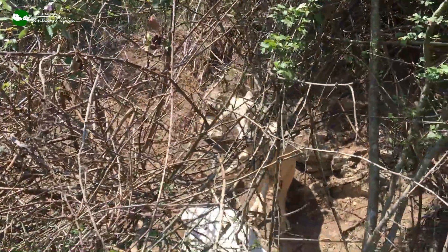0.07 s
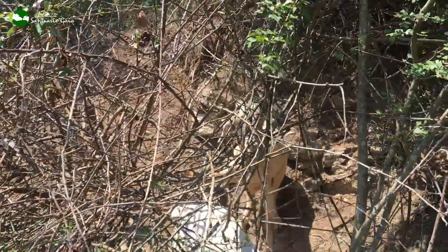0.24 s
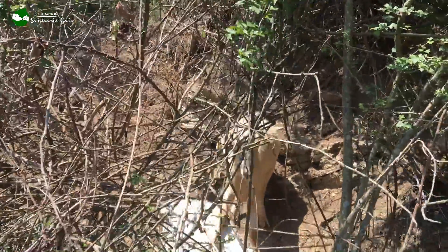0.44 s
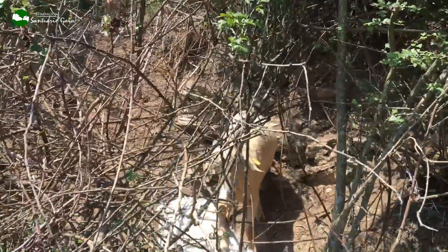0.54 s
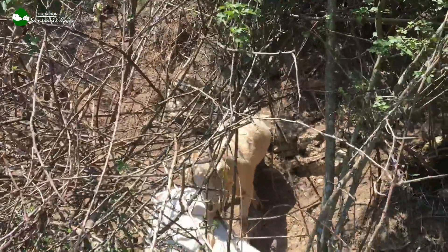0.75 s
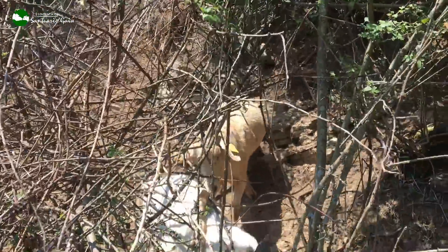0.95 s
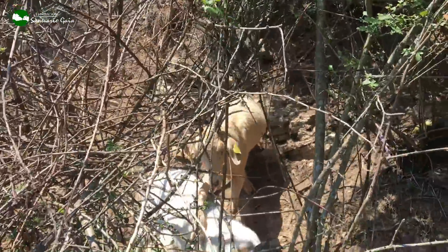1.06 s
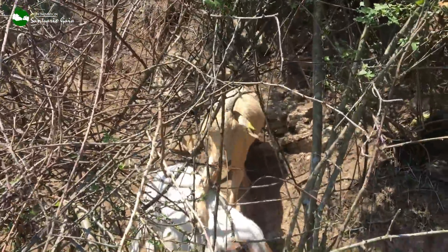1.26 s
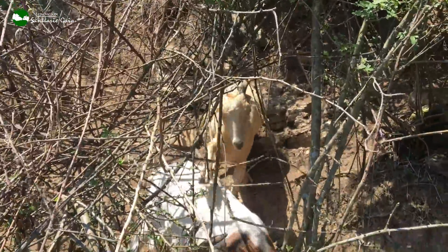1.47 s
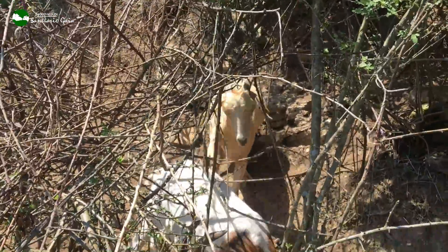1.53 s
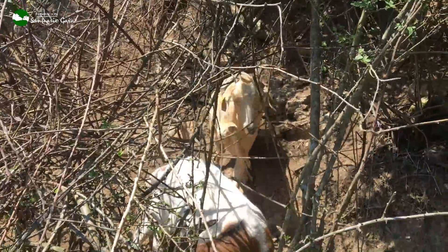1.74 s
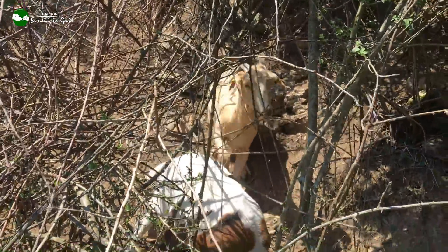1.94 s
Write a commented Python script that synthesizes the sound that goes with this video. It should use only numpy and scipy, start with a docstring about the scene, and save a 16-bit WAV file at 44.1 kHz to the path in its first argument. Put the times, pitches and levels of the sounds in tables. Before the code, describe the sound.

Goats moving through dead branches: light ticks, a dense burst of sharp snaps and leaf crunching, a quieter stretch, then late cracks. Soft dull hoof thuds and low outdoor air noise, dry single-channel pickup.

```python
"""Twigs crack in short splintering bursts, dry leaves crackle, hooves thud dully and air hisses and rumbles
quietly, as goats push through dry brush outdoors; a faint low tone swells in at the end.
Snaps and crunches are fading runs of noise that ring like dry wood. Leaves are thousands of tiny ticks
a second. Hooves are short low waves that sag in pitch, with dull grit. Hiss and rumble are filtered noise,
and the tone is a sine."""
import sys
import numpy as np
from scipy import signal
from scipy.fft import rfft, irfft
from scipy.io import wavfile

SR = 44100
rng = np.random.default_rng(int(sys.argv[2]) if len(sys.argv) > 2 else 0)


def linear_from_db(decibels):
    """Turn decibels (scalar or array-like) into linear amplitude factors; 0 gives 1."""
    return 10 ** (np.asarray(decibels, float) / 20)


def output_pcm(signal):
    """Save a mono or channel-first signal as 16-bit PCM at the path in sys.argv[1].

    Samples are clipped to [-1, 1] before scaling.
    """
    pcm = np.clip(np.atleast_2d(signal).T, -1, 1) * 32767
    wavfile.write(sys.argv[1], SR, np.round(pcm).astype(np.int16))


N = 88200   # length in samples: two seconds


def rms_one(x):
    """Scale a sound so that its average strength (rms) is 1."""
    return x / np.sqrt(np.mean(x ** 2) + 1e-20)


def band_filter(x, hz, kind):
    """Second-order Butterworth filter: keeps the lows, the highs or a band, with soft edges."""
    return signal.sosfilt(signal.butter(2, hz, kind, fs=SR, output="sos"), x)


def colour(x, db_of_hz):
    """Filter with the given gain in dB at each pitch, with no ringing ahead of a sound (minimum phase)."""
    size = 8192
    hz = np.maximum(np.arange(size // 2 + 1), 1) * SR / size
    log_gain = db_of_hz(hz) * np.log(10) / 20
    cepstrum = irfft(log_gain)
    # folding the second half onto the first makes the filter respond only after its input
    cepstrum[1:size // 2] *= 2
    cepstrum[size // 2 + 1:] = 0
    response = irfft(np.exp(rfft(cepstrum)))[:size // 2]
    return signal.fftconvolve(x, response)[:len(x)]


def table(points):
    """Turn (f/Hz, level/dB) points into a smooth function of Hz, straight between points in log pitch."""
    hz, db = np.transpose(points)
    return lambda f: np.interp(np.log(f), np.log(hz), db)


def drift(rate_hz):
    """Slow random wandering with rms 1: noise smoothed twice above about rate_hz."""
    r = np.exp(-2 * np.pi * rate_hz / SR)
    wander = signal.lfilter([1], [1, -2 * r, r * r], rng.standard_normal(N + SR))
    return rms_one(wander[SR:])   # the first second only settles the filter


def air():
    """Far hiss with a slight flicker, and a lumpy low rumble: two filtered noises."""
    # colour of the hiss: f/Hz, relative level/dB
    hiss_colour = [(40, -0.5), (100, -7), (300, -10), (700, -12), (1500, -10.5), (3000, -17.5), (7000, -21),
                   (16000, -20.5)]
    # loudness of the rumble, before its lumps: t/s, level/dB
    rumble_level = [(0, -69), (.25, -72), (.5, -64), (.9, -67), (1.2, -69.5), (1.4, -87), (1.7, -69),
                    (2.0, -72.5)]
    hiss_db, flicker_db, flicker_hz = -66, 1.5, 13.6
    lumps_db, lumps_hz = -4.5, 1.7
    hiss = colour(rng.standard_normal(N + SR), table(hiss_colour))
    hiss = rms_one(band_filter(hiss, 30, "high")[SR:])
    rumble = rms_one(band_filter(rng.standard_normal(N + SR), [35, 168], "band")[SR:])
    rumble_db = np.interp(np.arange(N) / SR, *np.transpose(rumble_level))
    hiss = linear_from_db(hiss_db + flicker_db * drift(flicker_hz)) * hiss
    return hiss + linear_from_db(rumble_db + lumps_db * drift(lumps_hz)) * rumble


def faint_tone():
    """A faint low tone near the end: a sine that swells in and stays."""
    start_s, rise_s, pitch_hz, level_db = 1.968, .025, 500, -59
    t = np.arange(N) / SR - start_s
    swell = np.clip(t / rise_s, 0, 1)
    return linear_from_db(level_db) * swell * np.sin(2 * np.pi * pitch_hz * t)


def hooves():
    """Hooves on soil: each is a soft push of a few low cycles that sag in pitch, with dull grit."""
    # hoof falls: t/s, level/dB, f/Hz (it sags from 1.2 to 0.7 times this), length/ms
    thuds = [(0.018, -59, 44.9, 125), (0.468, -50.5, 70, 45), (0.572, -53, 75, 45), (.703, -49, 88, 48),
             (1.098, -48, 130, 37), (1.715, -59, 190, 50)]
    grit_share = .45
    out = np.zeros(N + SR)
    grit = rms_one(band_filter(rng.standard_normal(N + SR), [40, 320], "band"))
    for (s, db, hz, ms), turn in zip(thuds, rng.random(len(thuds))):
        u = np.linspace(0, 1, int(ms * SR / 1000))   # progress through the thud
        start = int(s * SR)
        cycles = hz * ms / 1000 * (1.2 * u - .25 * u * u)
        push = np.sin(2 * np.pi * (cycles + turn)) + grit_share * grit[start:start + len(u)]
        out[start:start + len(u)] += linear_from_db(db) * np.sin(np.pi * u) ** 2 * push
    return out[:N]


def leaves():
    """Dry leaves: thousands of tiny uneven ticks a second, in clumps and sudden small bursts."""
    # movement in the brush: t/s, crackle level/dB, brightness/dB (treble up and the rest down by this)
    stir = [(0, -58.5, -0.5), (0.099, -54.5, -2), (0.203, -68, 2), (.205, -49.5, 0), (0.259, -49.5, 0),
            (.29, -57.5, -5), (0.428, -56, 0.5), (0.432, -45.5, -2), (.455, -45, -0.5), (0.496, -39, 3.5),
            (0.533, -48, 3), (0.575, -43.5, 3), (.61, -40.5, -2), (.64, -43.5, -0.5), (.675, -47.5, -1),
            (.72, -49, -1.5), (.79, -56.5, -3), (.9, -62.5, 0.5), (1.0, -64.5, -1.5), (1.11, -59.5, -2.5),
            (1.16, -69, -1.5), (1.35, -77, -5.5), (1.45, -65.5, 4), (1.53, -69, -1.5), (1.652, -58, 0),
            (1.678, -66.5, 3.5), (1.703, -55, -5), (1.73, -54.5, -4), (1.84, -63, -5.5), (1.93, -64, -8.5),
            (2.0, -70.5, -7.5)]
    # colour of the crackle: f/Hz, relative level/dB
    leaf_colour = [(120, -16.5), (300, 1), (700, -3.5), (1100, -1.5), (2000, -1.5), (2800, -2),
                   (4500, -5.5), (9400, -2), (15500, -3)]
    grains_per_s, grain_spread_db = 16000, 3.5
    clump_db, clump_hz = 2.5, 31
    twigs_per_s, twig_db, twig_spread_db, twig_t60_ms = 70, -5, 3, 14
    s, db, tilt_db = np.transpose(stir)
    t = np.arange(N) / SR

    size = linear_from_db(grain_spread_db * np.minimum(rng.exponential(1, N), 5))
    grains = (rng.random(N) < grains_per_s / SR) * size * rng.choice([-1, 1], N)
    # small twigs tick among the leaves: each makes the grains jump up, then die back
    twigs = (rng.random(N) < twigs_per_s / SR) * linear_from_db(twig_db + rng.normal(0, twig_spread_db, N))
    swell = 1 + signal.lfilter([1], [1, -linear_from_db(-60000 / twig_t60_ms / SR)], twigs)
    clumps = linear_from_db(clump_db * drift(clump_hz))
    crackle = rms_one(colour(grains * swell * clumps, table(leaf_colour)))

    dull = band_filter(crackle, 4000, "low")
    bright = band_filter(crackle, 4000, "high")
    tilt = linear_from_db(np.interp(t, s, tilt_db))
    # the two halves are in opposite phase at 4 kHz, so subtracting joins them without a hole
    return linear_from_db(np.interp(t, s, db)) * (dull / tilt - bright * tilt)


def cracks(rows, rise_ms, rattle_db, rattle_t60_ms, click):
    """Breaking wood: uneven noise splinters fade over a softer, longer rattle and ring like dry wood."""
    # brief resonances of dry wood: f/Hz, before each twig's own scatter
    twig_hz = [1080, 1580, 2080, 3700, 4550, 5700, 6500, 9400]
    ring_db, ring_width, ring_scatter = 8, .06, .03   # strongest ring; shares of its pitch
    splinter_db, mids_db, dip_db = .5, -14, -5   # unevenness; level near 4 kHz; valley near 2.8 kHz
    wood_low_hz, wood_low_db = 1020, -18   # thin wood gives little below this; loss an octave lower
    t_ms = np.arange(SR // 5) / SR * 1000
    draws = rng.standard_normal((len(rows), 2, len(t_ms)))
    rings = rng.random((len(rows), 2, len(twig_hz), 1))
    out = np.zeros(N + len(t_ms))
    for (s, db, low_db, high_db, t60_ms), (noise, grit), (strength, shift) in zip(rows, draws, rings):
        fade = linear_from_db(-60 * t_ms / max(t60_ms, 2)) + linear_from_db(rattle_db - 60 * t_ms / rattle_t60_ms)
        rise = 1 - np.exp(-t_ms / rise_ms)
        burst = noise * linear_from_db(splinter_db * grit) * rise * fade
        burst[1] += click * np.sign(noise[0])
        valley_db = (low_db + mids_db) / 2 + dip_db
        tone = table([(wood_low_hz / 2, low_db + wood_low_db), (wood_low_hz, low_db), (2100, low_db),
                      (2800, valley_db), (3700, mids_db), (4500, mids_db), (10000, high_db)])
        ring_hz = np.array(twig_hz)[:, None] * (1 + ring_scatter * (2 * shift - 1))

        def wood(f):
            """Gain in dB: the basic tone plus the strongest ring at each pitch."""
            bumps = strength * np.exp(-((f / ring_hz - 1) / ring_width) ** 2)
            return tone(f) + ring_db * bumps.max(0)

        out[int(s * SR):][:len(t_ms)] += linear_from_db(db) * colour(burst, wood)
    return band_filter(out[:N], wood_low_hz / 2, "high")


def crunches():
    """Slower crunches of dry leaves and bark: cracks with a gentler start, a long rattle and no click."""
    # crunches: t/s, level/dB, lows near 1.7 kHz/dB, highs near 10 kHz/dB
    rows = [(0.0561, -32.5, -13, -13.5), (0.0839, -30, -15, -15), (0.1088, -34, -14, -16),
            (0.204, -29, -9, -21), (0.2527, -24, -23, -43), (0.3741, -36, -13, -20),
            (0.4274, -24, -7.5, -8), (0.4622, -26.5, -13.5, -6.5), (0.4796, -22, -19, -9.5),
            (0.562, -26.5, -8, -7.5), (0.6254, -18, -12, -13.5), (0.7031, -24.5, -10.5, -15),
            (0.743, -36, -7, -19), (1.0226, -35, -23, -16), (1.095, -32, -17.5, -31),
            (1.1043, -39, -2, -17.5), (1.1687, -36, -13, -15.5), (1.4647, -37, -6.5, -18),
            (1.658, -39.5, -15, -7.5), (1.703, -18, -9, -20.5), (1.704, -11, -16, -18),
            (1.776, -28, -10.5, -19), (1.813, -34, -10, -18), (1.8271, -29.5, -9.5, -21),
            (1.8611, -34.5, -12, -18), (1.8854, -29.5, -7.5, -25), (1.9045, -43, -16, -12),
            (1.9625, -37.5, -6.5, -38)]
    fade_t60_ms = 45
    rows = [(*row, fade_t60_ms) for row in rows]
    return cracks(rows, rise_ms=.35, rattle_db=-31, rattle_t60_ms=200, click=0)


def snaps():
    """Sharp twig snaps: one click opens each snap over its splinters, and shaken twigs rattle on."""
    # snaps: t/s, level/dB, lows near 1.7 kHz/dB, highs near 10 kHz/dB, fade t60/ms (at least 2 is used)
    rows = [(0.0162, -24, -26, -14.5, 27), (0.161, -29, -31, -17.5, 7.7), (0.2198, -28.5, -11.5, -6.5, 5.2),
            (0.2266, -26.5, -27, -9, 4.9), (0.2484, -23, -17, -6, 10.7), (0.2617, -16.5, -24, -50, 13),
            (0.4498, -19, -23, -20, 8), (0.4685, -14, -13, -20, 13), (0.4926, -16.5, -26, 0.5, 10.7),
            (0.5038, -17, -30, -10, 7.1), (0.5174, -29, -28, -6, 14), (0.5395, -23, -6, -29, 3.7),
            (0.5792, -6, -13, -27, 10.5), (0.5825, -13.5, -16, -30, 29), (0.5975, -13, -24.5, -9.5, 49),
            (0.6363, -22.5, -35, -4, 11.5), (0.6598, -29, -10, -16, 11), (0.6945, -18, -15, -28, 16),
            (0.7162, -21.5, -13, -27, 32), (0.7613, -25, -13, -26, 19), (0.9137, -29, -17.5, -33, 27),
            (1.009, -27.5, -12.5, -30, 29), (1.1668, -33.5, -16.5, -14, 20),
            (1.2685, -26.5, -12.5, -6, 3.3), (1.4065, -39, -13, -19, 9.1),
            (1.4383, -26.5, -15.5, -16.5, 40), (1.4531, -23, -16.5, -28, 18), (1.762, -42, -41, 1.5, 6.7),
            (1.7817, -19, -16, -21, 38), (1.9112, -37.5, -31, -10.5, 6.8), (1.9575, -36, -8, -26, 9.1),
            (1.9895, -41, -21, -14, 9.2)]
    return cracks(rows, rise_ms=.1, rattle_db=-21, rattle_t60_ms=64, click=linear_from_db(12))


def scene():
    """Add all the sources together in one channel."""
    background = air() + faint_tone()
    movement = hooves() + leaves()
    breaking = crunches() + snaps()
    return (background + movement + breaking)[None]


def low_pass(x):
    """Removes everything above the highest recorded frequency."""
    return signal.sosfilt(signal.butter(12, 16630, fs=SR, output="sos"), x)


def record(dry):
    """The microphone adds small bumps and dips; the deep bass and the very top are cut."""
    # microphone colour: f/Hz, width/Hz, gain/dB
    mic_bumps = [(2280, 500, 0.5), (10450, 400, -4), (15300, 1100, -2.5)]
    # steep roll-off of the top: f/Hz, gain/dB
    top_cut = [(15300, 0), (15600, -30), (16400, -40), (16900, -70)]
    top = table(top_cut)

    def microphone(f):
        """Gain in dB at each pitch."""
        return top(f) + sum(db * np.exp(-((f - hz) / width) ** 2) for hz, width, db in mic_bumps)

    heard = colour(dry[0], microphone)
    mix = band_filter(heard, 32, "high")
    return low_pass(mix[None])


dry = scene()
out = record(dry)
output_pcm(out)
```